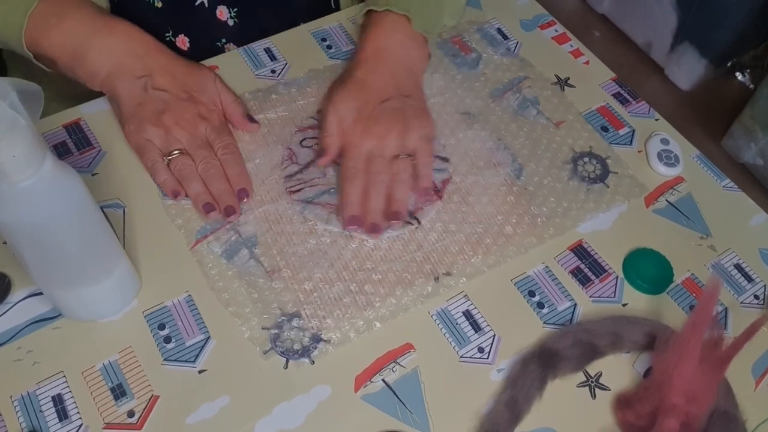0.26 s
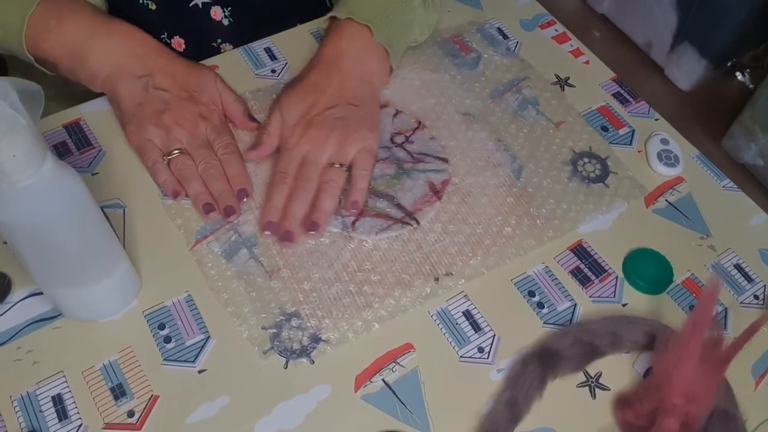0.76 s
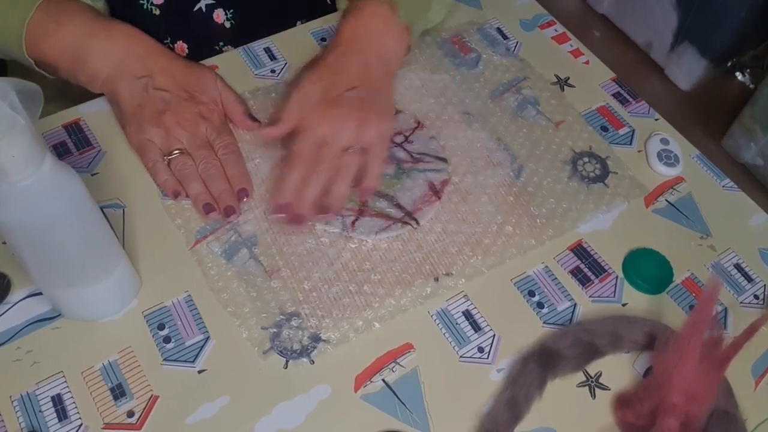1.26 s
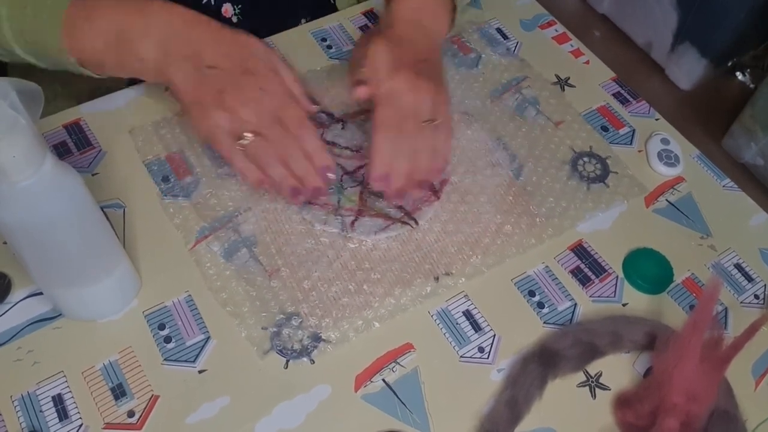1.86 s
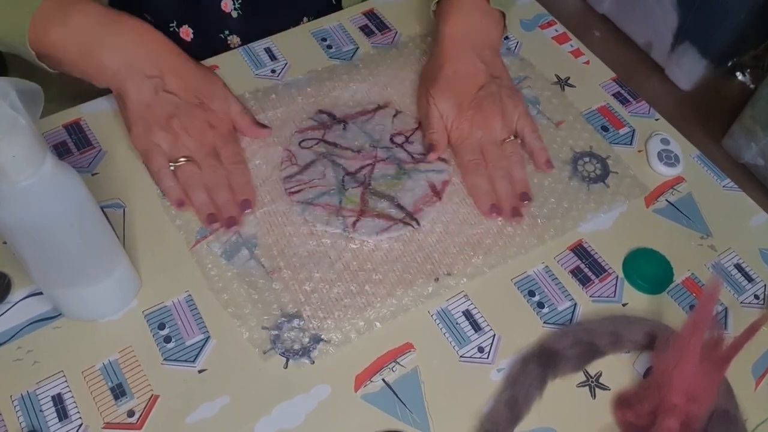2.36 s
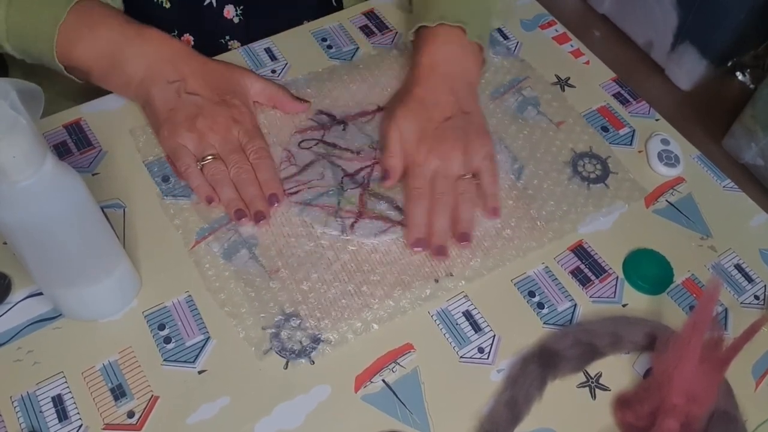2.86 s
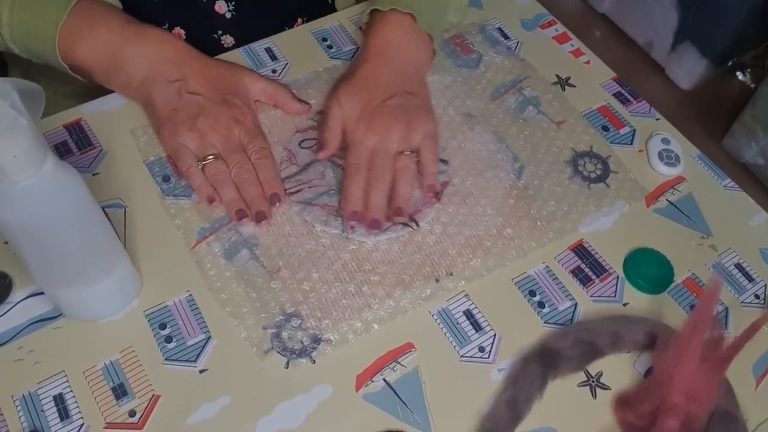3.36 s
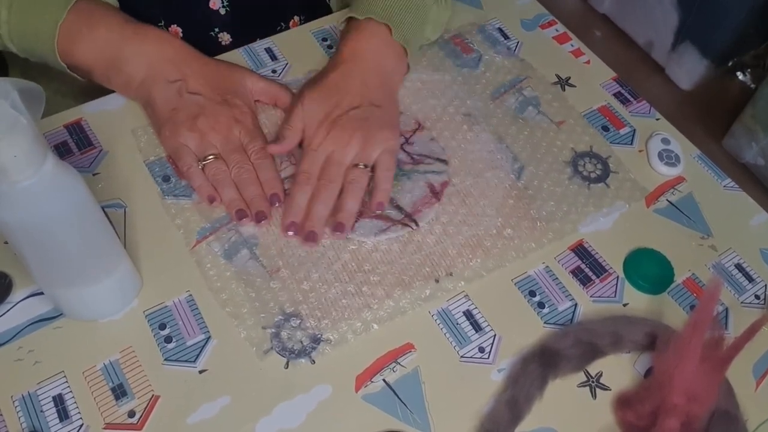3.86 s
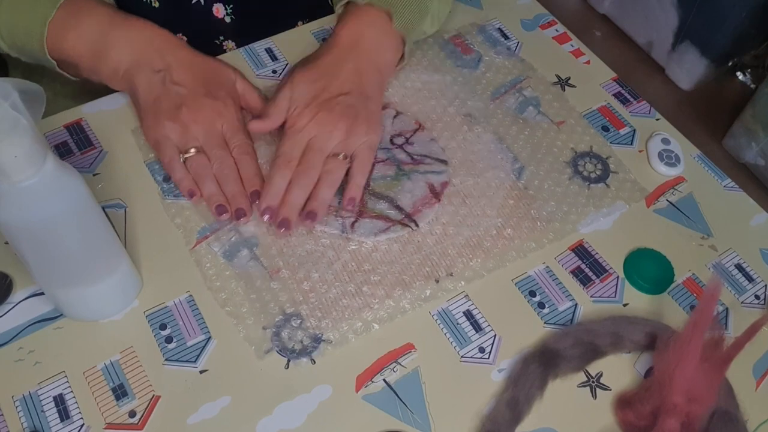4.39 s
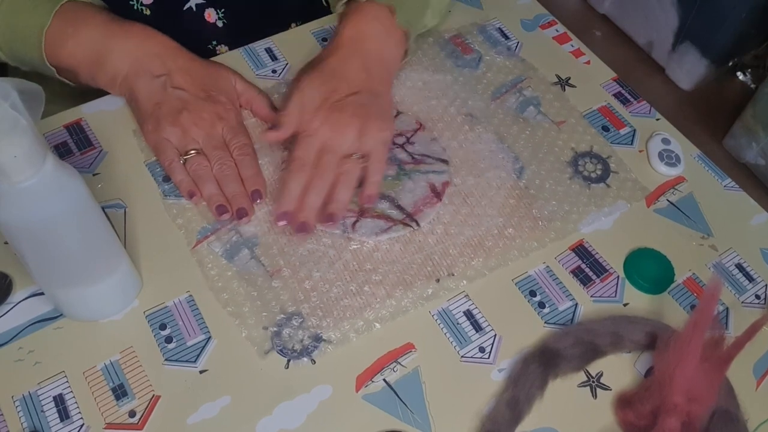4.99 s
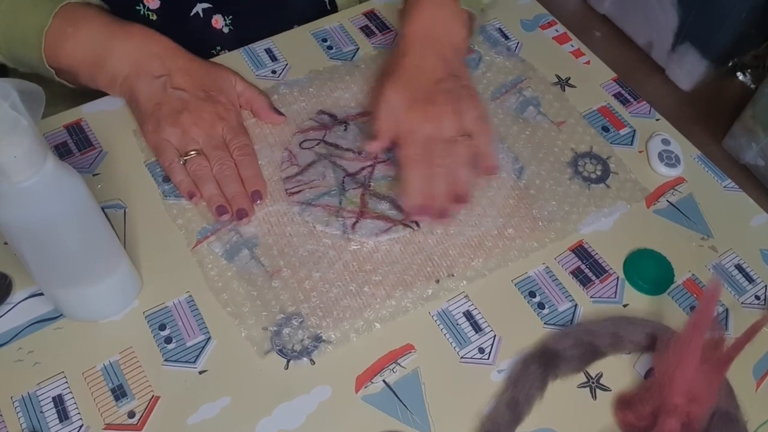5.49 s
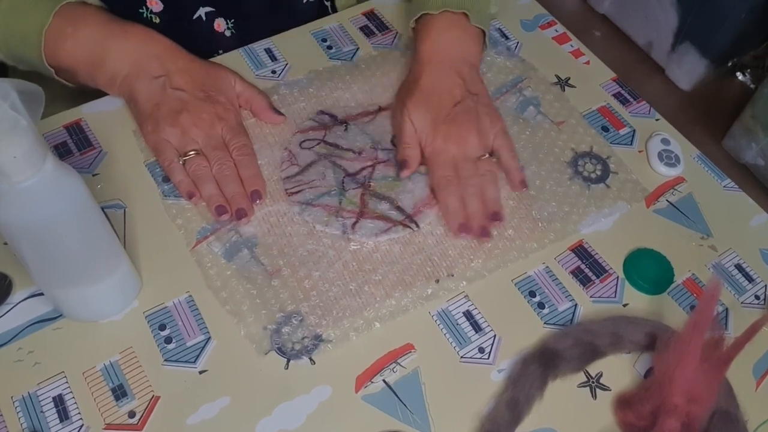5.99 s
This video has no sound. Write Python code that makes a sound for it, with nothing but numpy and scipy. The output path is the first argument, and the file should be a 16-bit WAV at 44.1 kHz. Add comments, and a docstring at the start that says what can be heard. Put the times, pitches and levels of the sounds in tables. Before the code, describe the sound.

Close, steady strokes of a palm swishing across bubble wrap, each starting with a plastic crunch and a dull table bump.

```python
"""A hand rubs bubble wrap in ten strokes, over wet, soapy wool on a table.
As the palm lands the film crunches and the table thumps; then skin swishes over the bubbles.
Between strokes the lather and the relaxing film tick faintly.
Close stereo microphones in a small room, the right one shadowed in the treble."""
import sys
import numpy as np
from scipy import signal
from scipy.fft import rfft, irfft, next_fast_len
from scipy.io import wavfile
from scipy.ndimage import map_coordinates

SR = 44100
rng = np.random.default_rng(int(sys.argv[2]) if len(sys.argv) > 2 else 0)


def wrap_up_sound(samples):
    """Save the sound to the file named by the first command line argument, as 16-bit audio."""
    columns = np.atleast_2d(samples).T
    # keep every value between -1 and 1, then stretch to whole-number steps
    tamed = np.clip(columns, -1, 1)
    steps = np.round(tamed * 32767).astype(np.int16)
    wavfile.write(sys.argv[1], SR, steps)


N = 275177
TIME = np.arange(N) / SR

# The palm slides over the film, speeding up and slowing; sag applies half a stroke from the fastest point:
# land_s, lift_s, friction_db, fastest_fraction, sag_db, dry_skin_treble_db, rustle_after_db
PALM_STROKES = [(0.089, 0.472, -46, 0.5, 4, -1.2, -65.5), (0.695, 1.099, -45.5, 0.57, 4, -1, -65.5),
                (1.309, 1.708, -45, 0.57, 6.5, 0.1, -61), (1.944, 2.37, -47.5, 0.66, 2.5, 0.6, -62.5),
                (2.554, 2.979, -45, 0.8, 4.5, 0.2, -63), (3.215, 3.605, -49, 0.75, 1.5, 1.4, -74),
                (3.807, 4.208, -47, 0.61, 7, 1.8, -66), (4.413, 4.838, -48, 0.67, 1.7, 2.8, -67.5),
                (5.07, 5.42, -47, 0.62, 3.8, 1.4, -66), (5.667, 6.032, -49, 0.52, 2.5, 2.7, -68.5)]
# Fingertips flick the film in passing: touch_s, lift_s, friction_db
FINGER_FLICKS = [(0.009, 0.041, -48.5), (4.219, 4.257, -49.5)]


def hand_motion():
    """Friction gain, arching with the speed of the hand, and progress 0-1 through each stroke."""
    friction, progress = np.zeros(N), np.zeros(N)
    for land_s, lift_s, top_db, fastest, sag_db, _, _ in PALM_STROKES:
        along = np.clip((TIME - land_s) / (lift_s - land_s), 0, 1)
        arch_db = top_db - sag_db * (2 * (along - fastest)) ** 2
        swell_db = np.exp(-((TIME - land_s - .04) / .014) ** 2)  # a brief lift just after landing
        friction += skin_contact(land_s, lift_s) * from_db(arch_db + swell_db)
        progress = np.where(TIME >= land_s, along, progress)
    for touch_s, lift_s, friction_db in FINGER_FLICKS:
        friction += skin_contact(touch_s, lift_s) * from_db(friction_db)
    return friction, progress


def skin_contact(land_s, lift_s, grip_s=0.0039, peel_db_per_s=399):
    """Share of full friction while skin grips the film, slides and peels off."""
    grip = 1 - np.exp(-np.maximum(TIME - land_s, 0) / grip_s)
    return grip * from_db(-peel_db_per_s * np.maximum(TIME - lift_s, 0))


# Wet skin on film, heard close: frequency_hz, level_db
SWISH_SPECTRUM = [(300, -41), (600, -18.5), (850, -9.5), (1150, -11.5), (1600, -4.5), (2450, -5.5),
                  (3050, 0), (4300, -2.5), (6000, -3.5), (7900, -7.5), (10500, -4.5), (13000, -4),
                  (16000, -6)]


def swish(friction, progress):
    """Wet skin slips over thousands of film wrinkles a second, plucking bubbles as it goes."""
    slips = grains(per_s=9000, spread_db=2.0, ring_s=0.00069)
    slips += from_db(-15.0) * grains(per_s=300, spread_db=1.5, ring_s=0.00032)
    cells = from_db(-11.5) * bubble_cells(plucks_per_cell_s=16, t60=0.044, low_hz=787, high_hz=5525)
    flutter = from_db(0.94 * drift(rate_hz=59))
    rub = at_microphones((slips + cells) * friction * flutter, SWISH_SPECTRUM)
    # a stroke starts thin and grows fuller as the palm flattens and slides off the wool
    body = butterworth(rub, 1, [750, 3200], "band")
    body_gain = from_db(-4.0 + 4.2 * progress ** 2)
    # a faster or drier hand sizzles more
    sizzle = butterworth(rub, 1, 7000, "high")
    land_s, lift_s, *_, dry_skin_db, _ = np.transpose(PALM_STROKES)
    dryness = from_db(np.interp(TIME, (land_s + lift_s) / 2, dry_skin_db))
    sizzle_gain = dryness * np.maximum(friction / from_db(-45.5), .4) ** 0.63
    return from_db(0.74) * (rub + (body_gain - 1) * body + (sizzle_gain - 1) * sizzle)


def bubble_cells(plucks_per_cell_s, t60, low_hz, high_hz, count=64):
    """Air cells plucked in passing, each with a short note and a direction of its own; rms 1."""
    out = np.zeros((2, N))
    for pitch_hz in np.geomspace(low_hz, high_hz, count) * rng.uniform(.98, 1.02, count):
        plucks = rng.random(N) < plucks_per_cell_s / SR
        angle = rng.uniform(0, 2 * np.pi)
        out += np.outer([np.cos(angle), np.sin(angle)], ring(plucks, pitch_hz, t60))
    return rms_one(out)


# The film crumples under the hand: start_s, level_db
FILM_CRUNCHES = [(0.019, -47.5), (0.111, -36), (0.704, -31.5), (1.3213, -30.5), (1.947, -48), (2.5704, -38),
                 (2.6103, -33), (2.657, -33.5), (2.717, -33), (2.9206, -38), (3.236, -39), (3.834, -38),
                 (4.241, -33.5), (4.261, -43), (4.4564, -27.5), (5.0797, -36), (5.6734, -36.5)]
# Crumpling film, heard close: frequency_hz, level_db
CRUNCH_SPECTRUM = [(250, -34), (700, 4), (1500, 2), (3200, 8), (5500, 7), (8000, 2), (11000, 3),
                   (16000, 3.5)]


def crunches():
    """Tight clusters of snaps as the film is flattened."""
    start_s, level_db = np.transpose(FILM_CRUNCHES)
    press = bursts(start_s - .001, from_db(level_db), rise_s=0.0035, decay_s=0.0077)
    snaps = grains(per_s=3600, spread_db=0.5, ring_s=0.00019)
    return from_db(-1.0) * at_microphones(press * snaps, CRUNCH_SPECTRUM)


# Palm and fingers land on the table: start_s, level_db, deep_part_db, hard_part_db
HAND_LANDINGS = [(0.031, -44, 1, -5), (0.108, -42.5, 3, -11), (0.711, -35.5, 4, -8.5),
                 (0.839, -53.5, -2, 8), (1.329, -29.5, -8.5, -13), (1.967, -38.5, -8, -13.5),
                 (2.096, -45, 1.5, 0.5), (2.58, -48.5, -20, 5), (2.615, -33.5, -6, -8.5),
                 (2.719, -32.5, -4, -16), (3.239, -43.5, -2, -12.5), (3.84, -42.5, -5.5, -14),
                 (4.434, -52, 11, 1), (4.464, -29.5, -6, -4.5), (5.091, -39, -11, -13),
                 (5.671, -53.5, 19.5, 6), (5.717, -68, 26.5, 1)]
# Modes of the table top, at the microphones: pitch_hz, level_db, t60_s, left_minus_right_db
TABLE_TOP_MODES = [(52, -7, 0.21, -16), (82, -3, 0.17, 4), (116.3, -11, 0.5, -13.5), (160, 0, 0.24, -4.5),
                   (173.5, -11.5, 0.2, -6), (211, -13, 0.04, -4), (266, -6, 0.11, -8),
                   (346.4, -7.5, 0.15, 5), (430, -6, 0.09, 2), (468, -14, 0.15, -4), (546, -16, 0.2, 1),
                   (630, -19.5, 0.12, 18), (735, -13, 0.12, 1), (848, -11.5, 0.099, 6),
                   (1297, -14.5, 0.019, 29)]


def table_thumps():
    """Each landing taps the table's modes; the weight of the arm follows and shakes the deep ones."""
    start_s, level_db, deep_db, hard_db = np.transpose(HAND_LANDINGS)
    onsets = np.round((start_s - .003) * SR).astype(int)
    latest_landing = np.maximum(np.searchsorted(onsets, np.arange(N), side="right") - 1, 0)
    settling = bursts(start_s, np.ones(len(start_s)), rise_s=0.00052, decay_s=0.018)
    leaning = 3.33 * bursts(start_s, np.ones(len(start_s)), rise_s=0.015, decay_s=0.027)
    out = np.zeros((2, N))
    for pitch_hz, mode_db, t60, pan_db in TABLE_TOP_MODES:
        deep, hard = pitch_hz < 135, pitch_hz > 235
        shake = .014 * rng.standard_normal(N) + 0.031 * rng.standard_normal((2, N))
        force = (leaning if deep else settling) * shake
        # the soft palm reaches each mode at a slightly different moment
        force[:, onsets + (rng.uniform(0, .004, len(onsets)) * SR).astype(int)] += 1
        force *= from_db(level_db + deep * deep_db + hard * hard_db + mode_db)[latest_landing]
        out += ring(force, pitch_hz, t60) * from_db([[pan_db / 2], [-pan_db / 2]])
    return from_db(-1.5) * butterworth(out, 5, 40, "high")  # the slowest flexing radiates no sound


# The table under the dragging palm: frequency_hz, level_db
RUMBLE_SPECTRUM = [(20, -22), (45, -1), (75, 4), (120, -6), (160, -5), (210, -13), (400, -19.5), (700, -33),
                   (1500, -23.5)]


def drag_rumble(friction):
    """The palm bumps over the bubbles and shakes the table, most at the start of a stroke."""
    land_s = [stroke[0] for stroke in PALM_STROKES]
    weight = 1 + 3.4 * bursts(land_s, np.ones(len(land_s)), rise_s=0.018, decay_s=0.099)
    bumps = friction * weight * rng.standard_normal((2, N))
    return from_db(-14.0) * at_microphones(bumps, RUMBLE_SPECTRUM)


# Foam and relaxing film, heard close: frequency_hz, level_db
LATHER_SPECTRUM = [(400, -12), (1000, -21), (2500, -10.5), (4200, 0.5), (6000, -4.5), (8000, -9),
                   (12000, -3.5), (16000, -5.5)]


def lather():
    """Foam bursts and the film springs back after each stroke, dying down until the next."""
    _, lift_s, *_, rustle_db = np.transpose(PALM_STROKES)
    unrest = bursts(lift_s, from_db(rustle_db), rise_s=0.056, decay_s=0.14)
    ticks = grains(per_s=200, spread_db=3.3, ring_s=.00035)
    fizz = 1.16 * grains(per_s=7800, spread_db=8.0, ring_s=0.00066)
    return from_db(-2.0) * at_microphones(unrest * (ticks + fizz), LATHER_SPECTRUM)


# Single wrinkles spring back: start_s, level_db
WRINKLE_TICKS = [(0.5432, -49), (0.625, -53), (1.8367, -54), (1.8532, -55), (3.672, -55), (3.772, -58),
                 (4.328, -51), (4.9377, -47), (6.115, -49.5)]


def wrinkle_ticks():
    """Lone, tiny snaps of the released film."""
    start_s, level_db = np.transpose(WRINKLE_TICKS)
    snaps = bursts(start_s, from_db(level_db), rise_s=0.0001, decay_s=0.0015)
    return from_db(-5.5) * at_microphones(snaps * rng.standard_normal((2, N)), LATHER_SPECTRUM)


def wall_reflections(sound, t60, wet_db):
    """The close sound plus a short diffuse tail from the nearby walls."""
    age = TIME[:SR // 2]
    tail = rng.standard_normal((2, len(age))) * from_db(-60 * age / t60) * (age > .004)
    tail /= np.sqrt(np.sum(tail ** 2, axis=1, keepdims=True))
    return sound + from_db(wet_db) * signal.fftconvolve(sound, tail, axes=1)[:, :N]


# The small room at rest: frequency_hz, level_db
ROOM_SPECTRUM = [(20, -14), (45, -9), (70, -0.5), (130, -9.5), (250, -17.5), (600, -22), (2000, -26),
                 (8000, -31.5), (16000, -36)]


def room_tone():
    """A faint, steady, low hush behind the table."""
    return from_db(-74.5) * at_microphones(rng.standard_normal((2, N)), ROOM_SPECTRUM)


# The right microphone is shadowed, with a deep treble notch: frequency_hz, left_minus_right_db
MIC_SHADOW = [(50, -1.5), (140, -7), (480, -2.5), (800, 4), (1200, 9), (2500, 14.5), (3200, 12.5),
              (6200, 19), (8000, 30), (9400, 10), (10500, 5), (13000, 18), (16000, 24)]
# How alike the two microphones sound: frequency_hz, correlation
MIC_LIKENESS = [(60, 0.71), (300, 0.2), (800, 0.24), (3000, 0.35), (8000, 0.048)]


def at_microphones(pair, spectrum, right_lag_s=.00008):
    """Colour two unrelated signals and blend them into left and right; the right hears them later."""
    size = next_fast_len(N + SR)
    hz = np.maximum(np.arange(size // 2 + 1) * SR / size, 1)
    mid, side = rfft(pair, size)
    alike = np.clip(at_hz(MIC_LIKENESS, hz), -1, 1)
    signs = np.array([[1], [-1]])
    shadow = from_db(signs * at_hz(MIC_SHADOW, hz) / 2)
    shadow /= np.sqrt(np.mean(shadow ** 2, axis=0))
    colour = rms_one(from_db(at_hz(spectrum, hz)))
    blend = np.sqrt(1 + alike) * mid + np.sqrt(1 - alike) * side * signs
    blend[1] *= np.exp(-2j * np.pi * hz * right_lag_s)
    return irfft(blend * shadow * colour, size)[:, :N]


def grains(per_s, spread_db, ring_s):
    """Random snaps of uneven size, each a quickly dying burst of noise; rms 1."""
    born = rng.random(N) < per_s / SR
    sizes = from_db(spread_db * np.minimum(rng.exponential(1, N), 4))
    energy = signal.lfilter([1], [1, -np.exp(-1 / (ring_s * SR))], born * sizes ** 2 + 1e-18)
    return rms_one(np.sqrt(energy) * rng.standard_normal((2, N)))


def bursts(times, gains, rise_s, decay_s):
    """An envelope that swells and dies away at each given time."""
    out = np.zeros(N)
    for start_s, gain in zip(times, gains):
        age = np.maximum(TIME - start_s, 0)
        out += gain * (1 - np.exp(-age / rise_s)) * np.exp(-age / decay_s)
    return out


def ring(force, hz, t60):
    """A unit click sets a sine of height 1 ringing."""
    decay, step = from_db(-60 / (t60 * SR)), 2 * np.pi * hz / SR
    return signal.lfilter([0, np.sin(step)], [1, -2 * decay * np.cos(step), decay ** 2], force + 1e-18)


def drift(rate_hz):
    """Smooth random wander of spread 1."""
    knots = rng.standard_normal(N // 20)
    return rms_one(map_coordinates(knots, [TIME * rate_hz], order=1, mode="wrap"))


def butterworth(x, order, hz, kind):
    """Filter with a flat passband."""
    return signal.sosfilt(signal.butter(order, hz, kind, fs=SR, output="sos"), x)


def at_hz(points, hz):
    """Read a table on a log-frequency axis."""
    points = np.array(points)
    return np.interp(np.log(hz), np.log(points[:, 0]), points[:, 1])


def from_db(db):
    """Decibels to gain."""
    return 10 ** (np.asarray(db) / 20)


def rms_one(x):
    """Scale to unit rms."""
    return x / np.sqrt(np.mean(x ** 2) + 1e-20)


def scene():
    """Film, lather and table up close, over a quiet room."""
    friction, progress = hand_motion()
    film = swish(friction, progress) + crunches() + wrinkle_ticks() + lather()
    film = wall_reflections(film, t60=0.28, wet_db=-13.5)
    return film + room_tone() + table_thumps() + drag_rumble(friction)


def record(dry):
    """The top is cut steeply."""
    cutoff_hz = 15950
    return signal.sosfilt(signal.ellip(12, .1, 80, cutoff_hz, fs=SR, output="sos"), dry)


dry = scene()
out = record(dry)
wrap_up_sound(out)
```